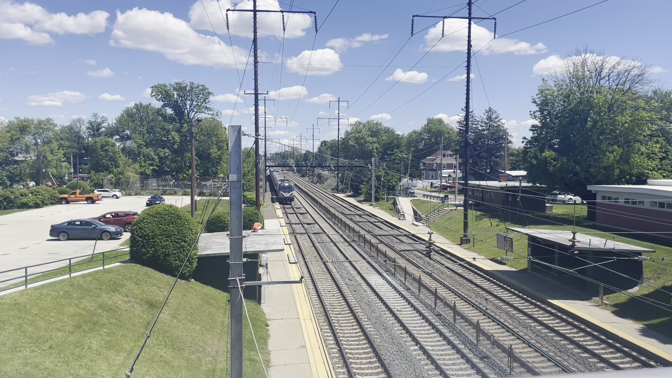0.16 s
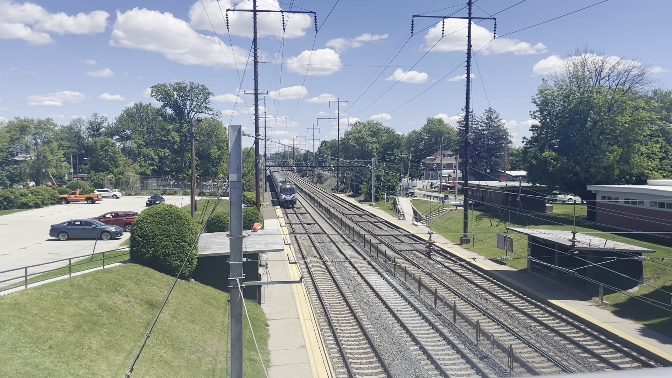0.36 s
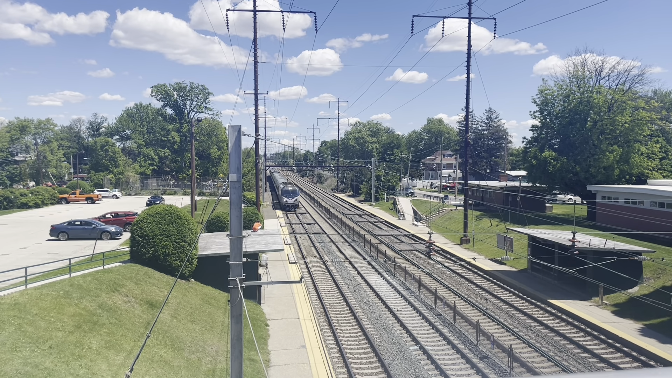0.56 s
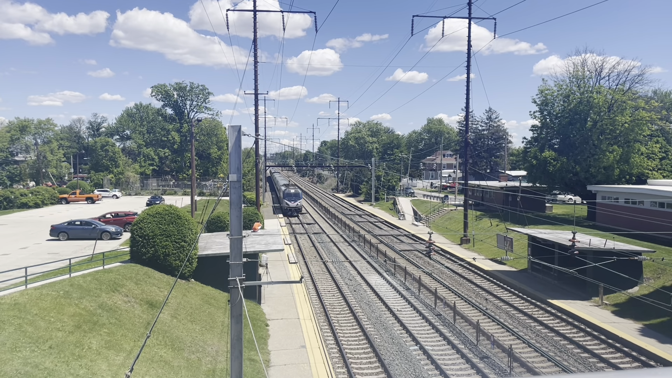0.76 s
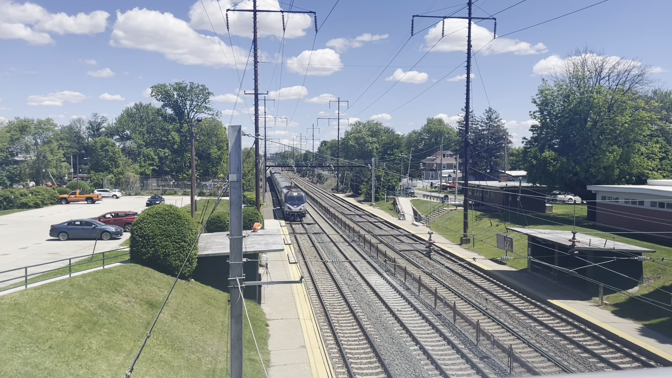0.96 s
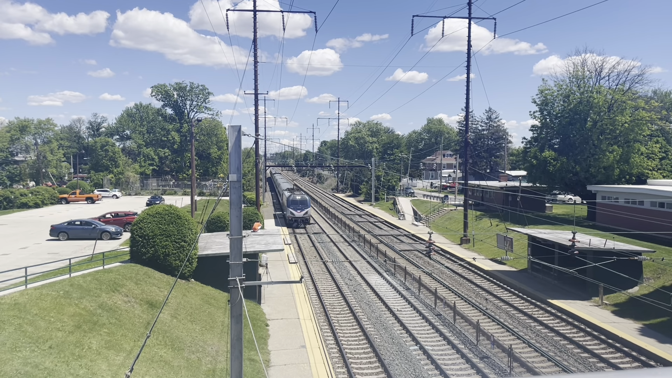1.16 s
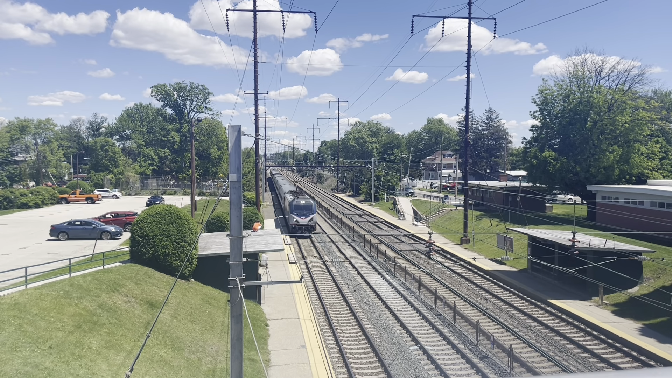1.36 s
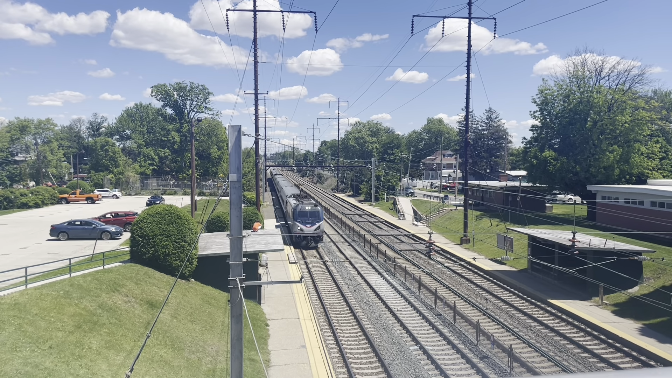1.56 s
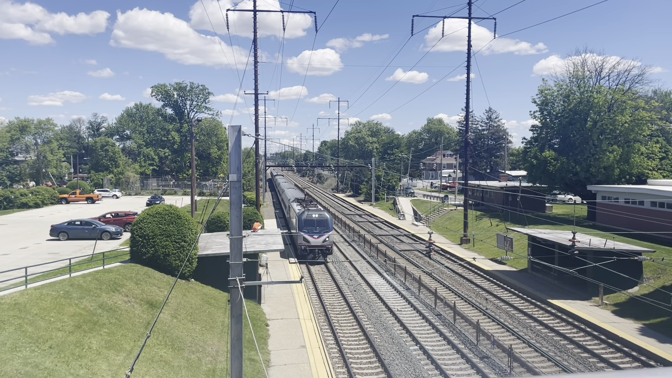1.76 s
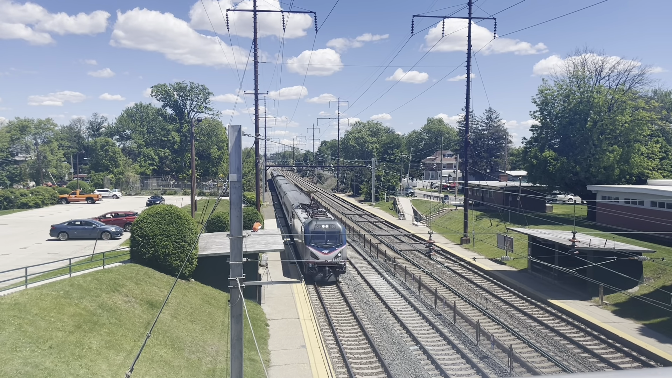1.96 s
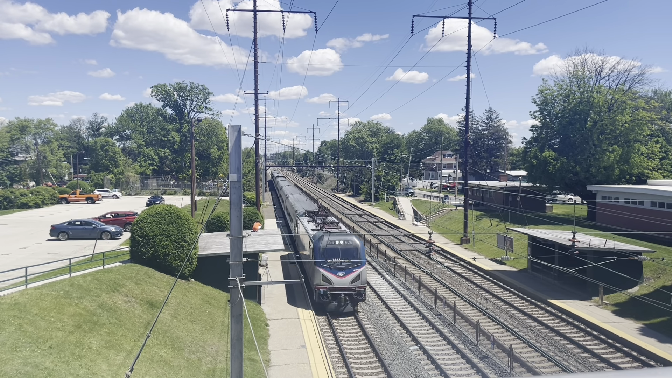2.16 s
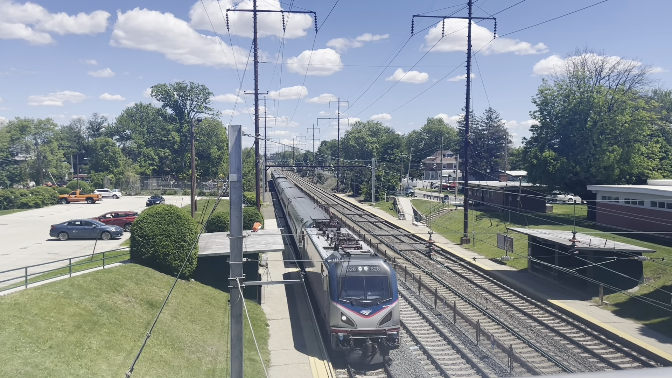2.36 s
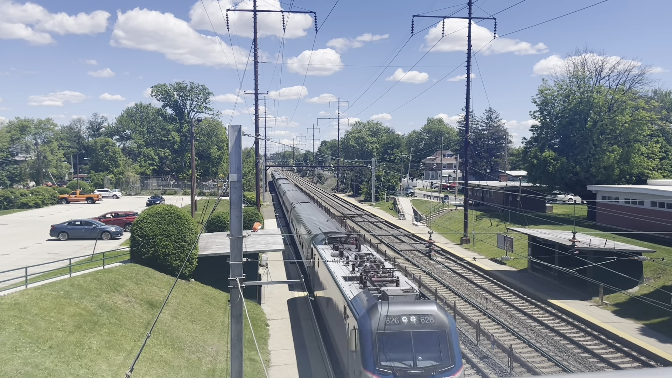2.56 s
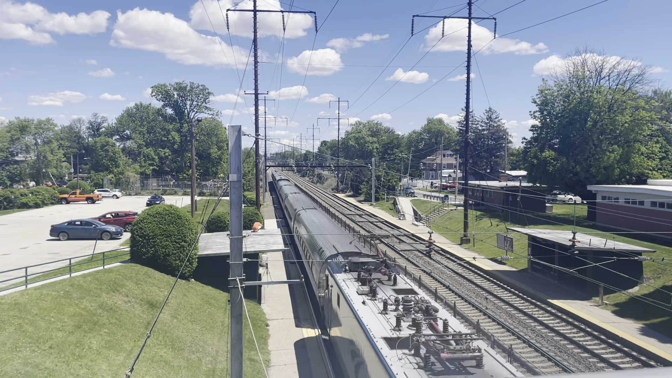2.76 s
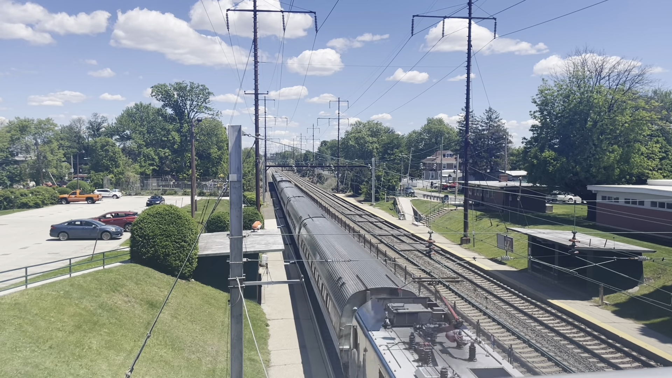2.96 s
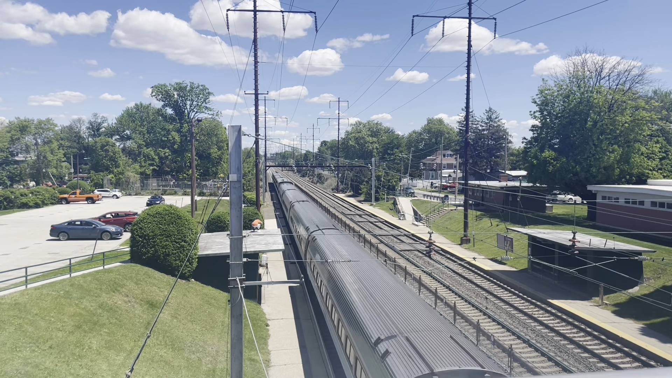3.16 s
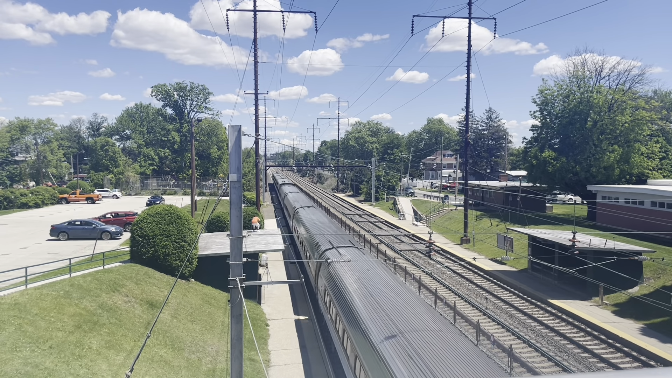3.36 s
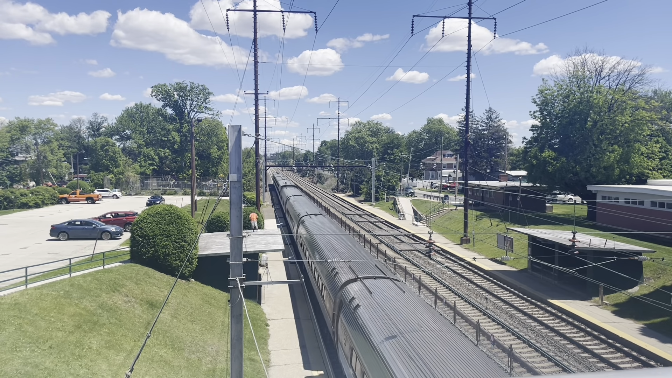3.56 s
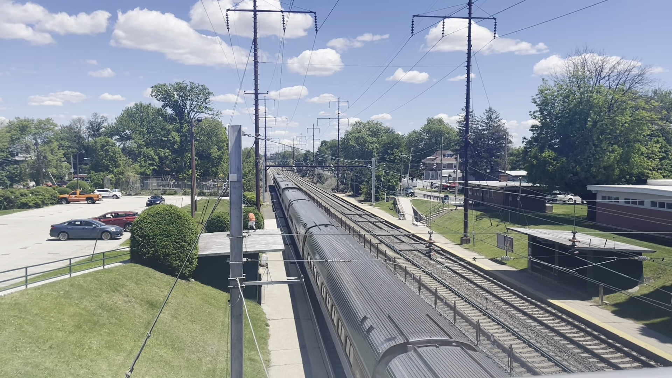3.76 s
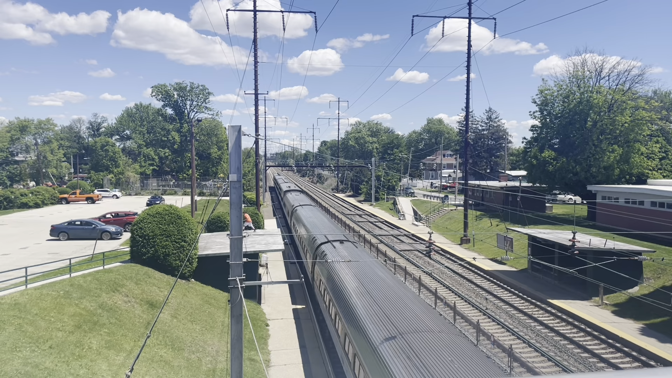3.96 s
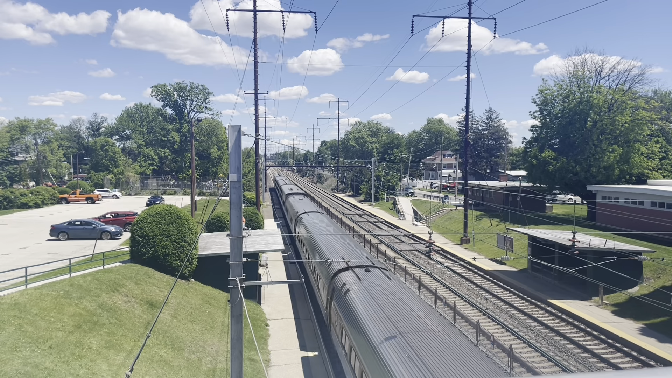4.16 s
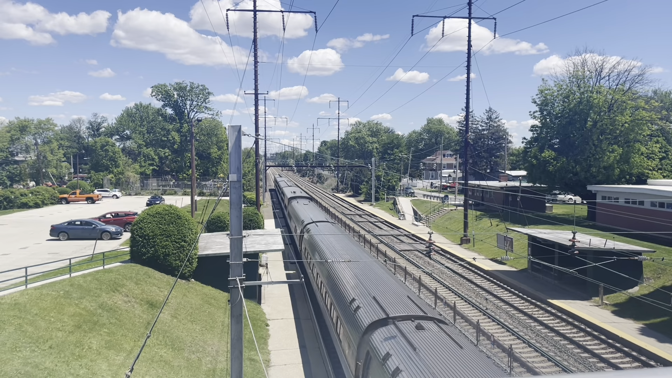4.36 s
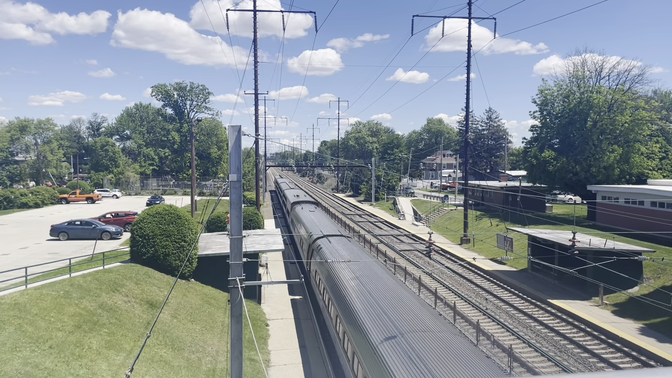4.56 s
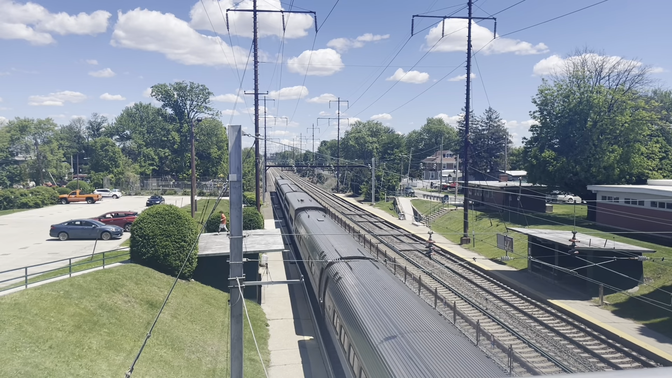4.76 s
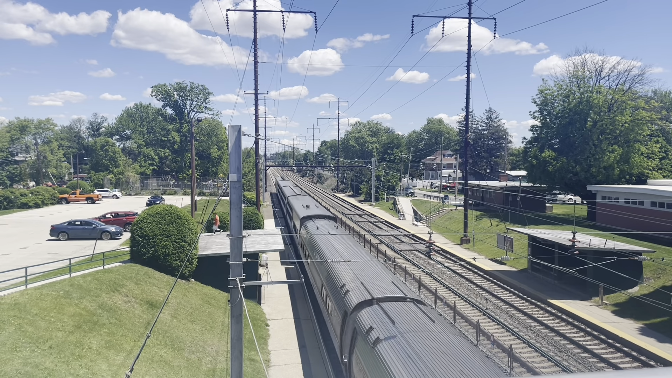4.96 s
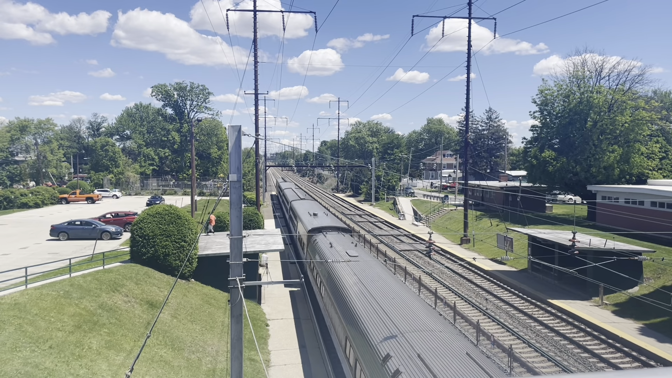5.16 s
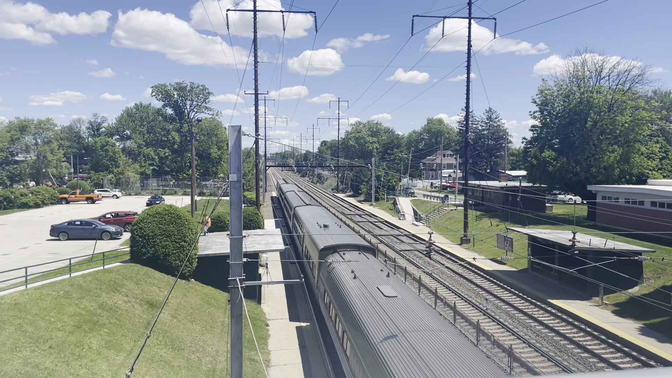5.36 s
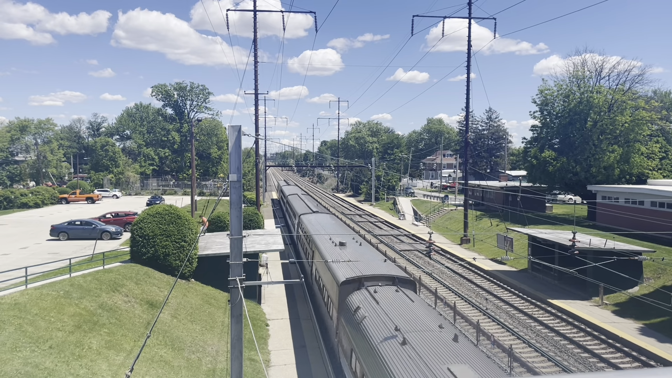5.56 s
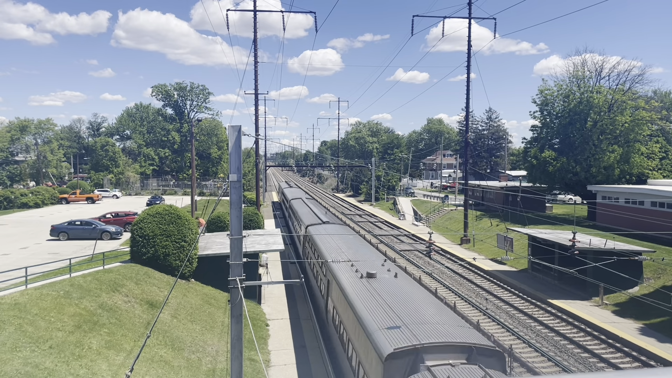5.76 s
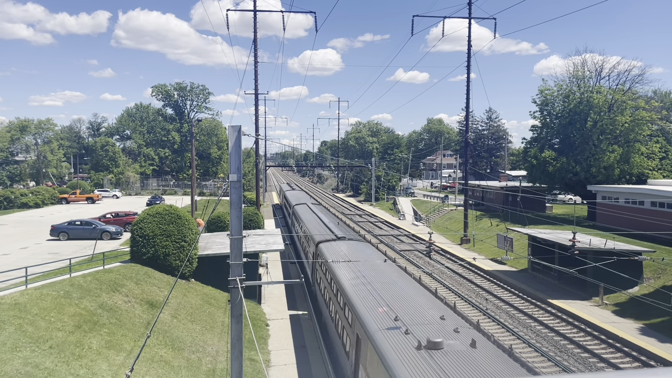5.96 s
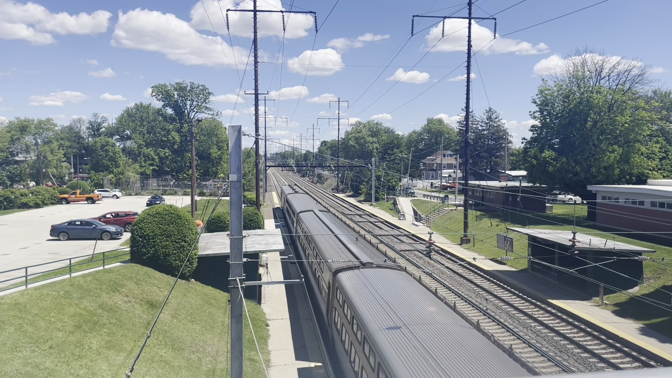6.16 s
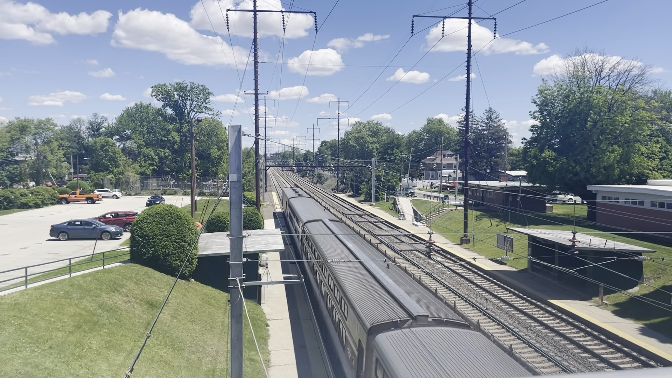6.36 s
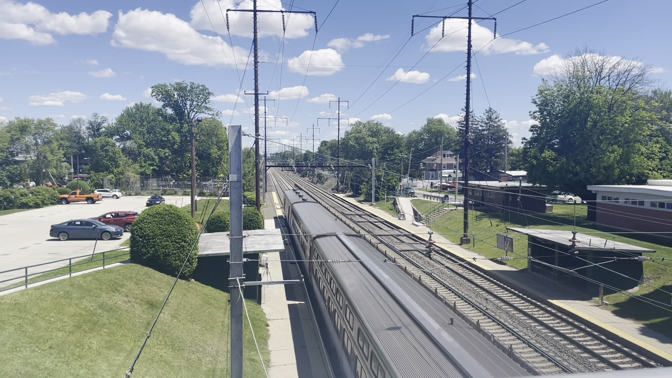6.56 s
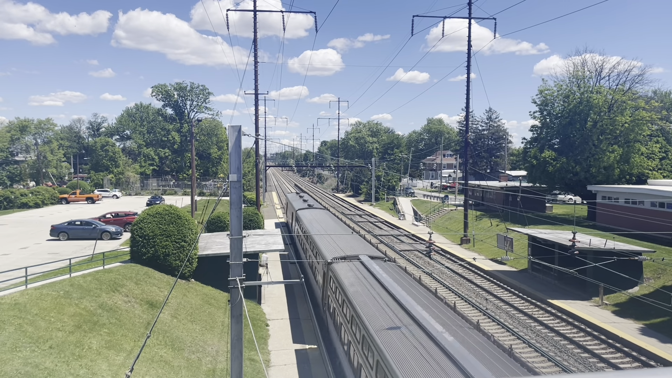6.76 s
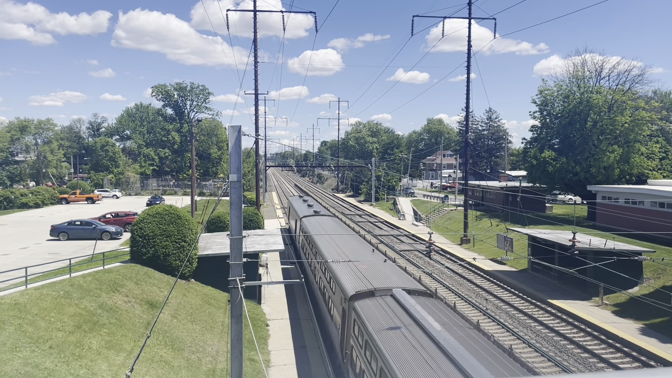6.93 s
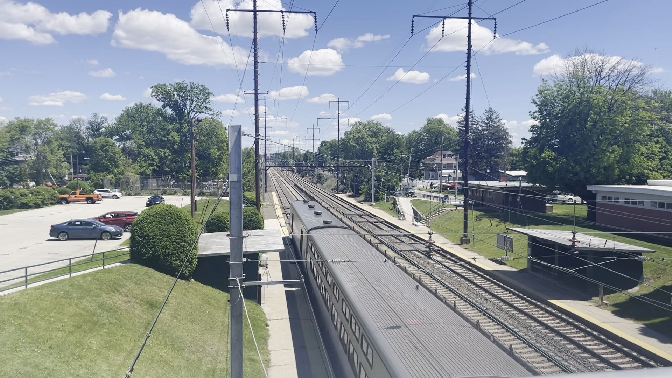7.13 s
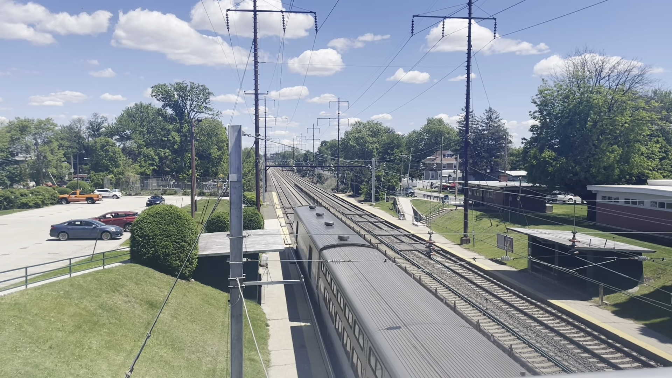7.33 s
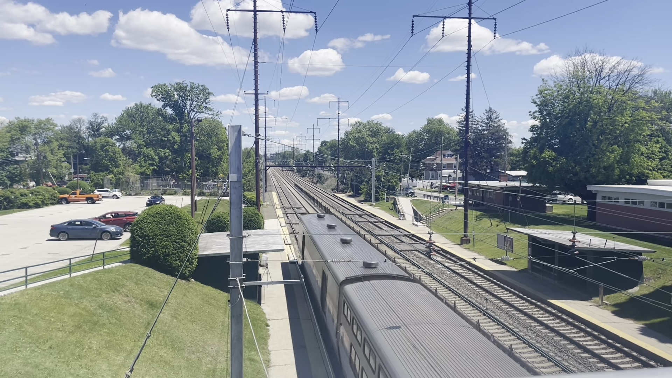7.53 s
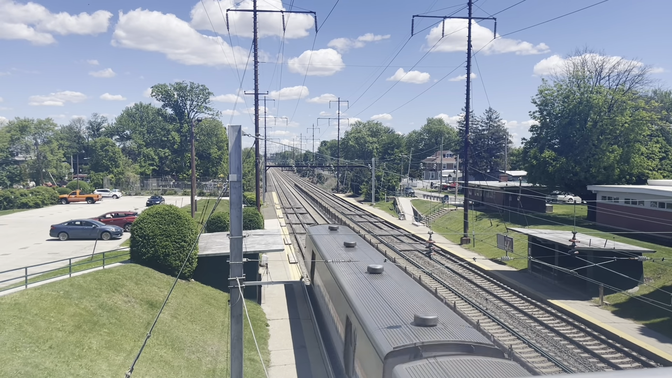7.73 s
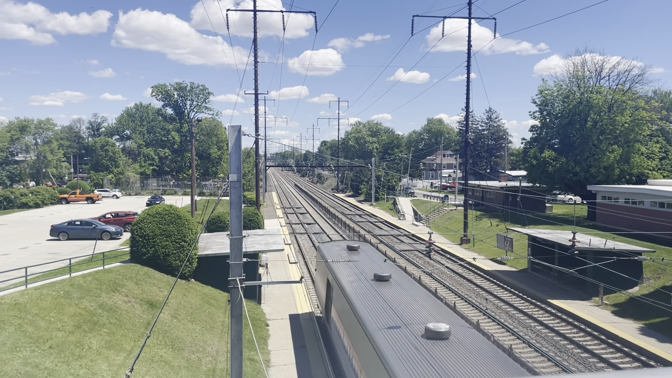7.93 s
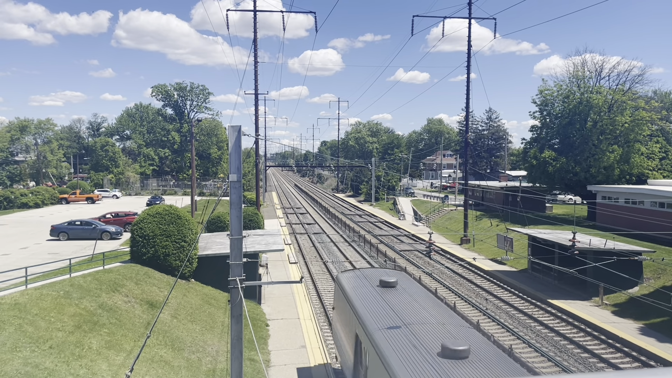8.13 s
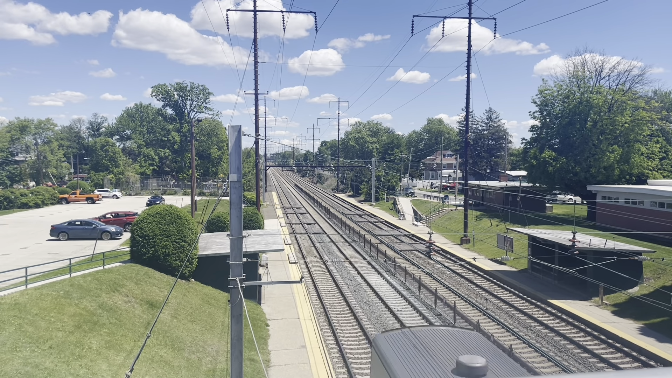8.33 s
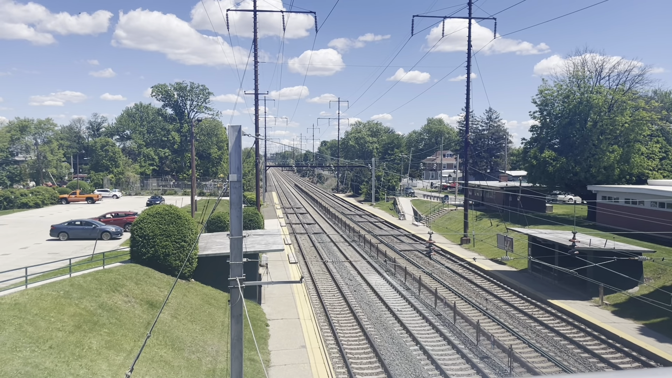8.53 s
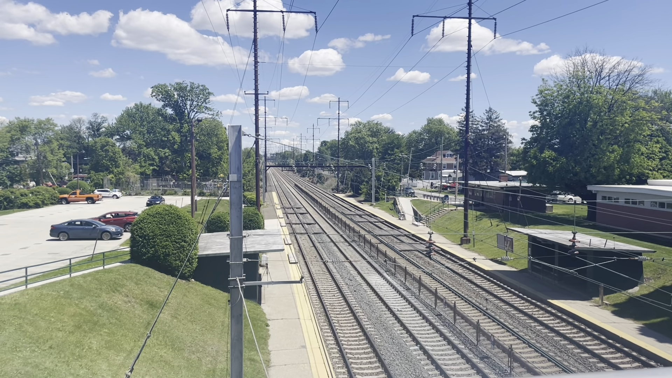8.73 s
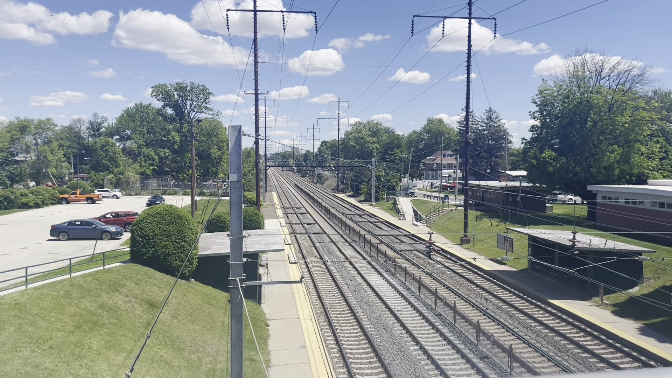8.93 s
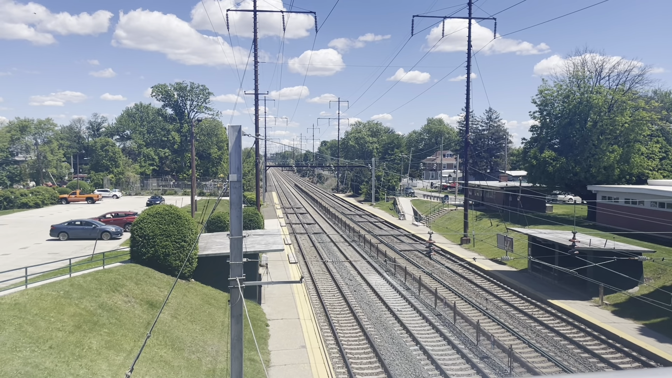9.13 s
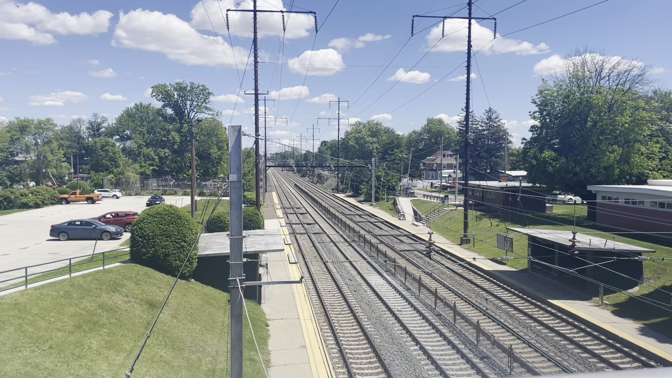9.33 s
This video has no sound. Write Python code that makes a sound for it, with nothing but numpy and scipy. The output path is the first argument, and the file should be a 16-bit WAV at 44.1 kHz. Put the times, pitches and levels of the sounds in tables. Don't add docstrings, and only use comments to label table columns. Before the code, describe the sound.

Outdoors on a road bridge above railway tracks, a bird whistles briefly over insects and distant traffic. An electric locomotive approaches with blower roar, hum and broken whine, then rushes underneath. Coaches follow in pulsing rumble, rough wheel roar and airy hiss, with metallic clanks. The train ends abruptly and a car passes close by, thumping twice. Stereo phone microphone on the parapet.

```python
import sys
import numpy as np
from scipy import signal
from scipy.fft import rfft, irfft, next_fast_len
from scipy.io import wavfile
from scipy.ndimage import uniform_filter1d

SR = 44100
rng = np.random.default_rng(int(sys.argv[2]) if len(sys.argv) > 2 else 0)


def generate_wav(signal):
    frames = np.transpose(np.atleast_2d(signal))
    scaled = np.clip(frames, -1, 1) * 32767
    pcm = np.round(scaled).astype(np.int16)
    wavfile.write(sys.argv[1], SR, pcm)


def decibels_to_gain(level_db):
    exponent = np.asarray(level_db, float) / 20
    return 10 ** exponent


N = 418744
M = next_fast_len(N)
HZ = np.maximum(np.arange(M // 2 + 1) * SR / M, 1)
TIME = np.arange(N) / SR

# t/s, level/dB
CAR = [(8.3, -72), (8.6, -42), (8.9, -31.5), (9.1, -29.5), (9.3, -30.5), (9.5, -29.5)]
AIR_COLUMN, BRAKE_COLUMN, WHEEL_COLUMN, LOAD_COLUMN = 1, 2, 3, 4


def curves(table):
    s, *columns = np.transpose(table)
    return [np.interp(TIME, s, column) for column in columns]


def walk(rate):
    hold = int(SR / rate)
    steps = np.repeat(rng.standard_normal(N // hold + 1), hold)
    smooth = uniform_filter1d(uniform_filter1d(steps, hold), hold)[:N]
    return smooth / smooth.std()


def roar(colour, patchy_db, rate):
    hz, db = np.transpose(colour)
    gain = decibels_to_gain(np.interp(np.log(HZ), np.log(hz), db, left=-120, right=-120))
    chance = rng.standard_normal((2, 2, len(HZ)))
    noise = irfft((chance[0] + 1j * chance[1]) * gain, M)[:, :N]
    noise = noise * decibels_to_gain(patchy_db * walk(rate))
    return noise / noise.std()


def tone(hz, gain, scatter, rate):
    paths = 1 + scatter * (walk(rate) + 1j * walk(rate))
    paths = paths / np.sqrt(1 + 2 * scatter ** 2)
    turning = np.exp(2j * np.pi * np.cumsum(hz) / SR)
    return np.sqrt(2) * gain * (paths * turning).imag


def notes(rows, edge):
    gain = np.zeros(N)
    for s, length, db, *_ in rows:
        to_nearest_end = np.minimum(TIME - s, s + length - TIME)
        gain += decibels_to_gain(db) * np.clip(to_nearest_end / edge, 0, 1)
    return gain


def passes(column, level_db, share, nearing, leaving, far_db, far_share):
    # t/s, air/dB, brake/dB, wheel roughness/dB, axle load/dB
    bogies = [(2.69, 1.5, -3, 5.5, -1), (2.86, -0.5, 0.5, -8.5, 4.5), (3.09, 0.5, 0.5, 5.5, 6.5),
              (3.38, 2.5, 2, 2.5, 4), (3.85, 1, 0.5, 2.5, 1), (4.0, 1, -1, 3, 6), (4.25, -11, -4.5, -14, 2),
              (4.49, .5, -.5, -8, -10), (4.7, 1.5, 0.5, 1.5, -1), (5.17, .5, 0, -3, -1.5),
              (5.35, 0, 0.5, 4, 2), (5.78, -0.5, 1.5, -1.5, -0.5), (5.95, 1, 1.5, 4.5, 1),
              (6.46, -0.4, 1.3, 3.5, -5), (6.65, 0.5, 1.2, 3, 0.5), (7.08, -2, 0, -17, -18),
              (7.33, 4.5, 3, 6.5, 3.5), (7.85, 1, 2, 5, 5.5), (7.95, -0.5, 0, 1, -1), (8.39, 1, 1, 5, 3),
              (8.8, -18, -14.5, -4.5, -2.5)]
    # t/s, level/dB
    train = [(0, -11), (.3, -10), (1.4, -3), (2.3, -.5), (2.8, 2), (3.6, -6), (4.3, -8), (8.4, -8.5),
             (8.9, -9.5), (9.5, -11)]
    coarse, rows = TIME[::256], np.array(bogies)
    away = coarse - rows[:, :1]
    spread = 1 + (away / np.where(away < 0, nearing, leaving)) ** 2
    near_power = ((decibels_to_gain(share * rows[:, [column]]) / spread) ** 2).sum(axis=0)
    far_power = decibels_to_gain(far_db + far_share * np.interp(coarse, *np.transpose(train))) ** 2
    return decibels_to_gain(level_db) * np.interp(TIME, coarse, np.sqrt(near_power + far_power))


def surroundings():
    # f/Hz, level/dB per Hz
    town = [(18, -39), (30, -4), (108, 2), (274, -15), (353, -6), (766, -6.5), (858, -12.5), (1180, -9.5),
            (3300, -23.5), (6540, -80), (7000, -51), (9100, -77), (15400, -120)]
    insects = [(6500, -51), (8900, -21), (9500, 2), (9900, -2), (10500, 2), (10850, 2), (11250, 7),
               (11500, 3), (11800, 3), (12300, -4), (13300, 1), (13600, 1), (14000, -12), (15700, -16)]
    traffic = decibels_to_gain(-38) * roar(town, patchy_db=-2.0, rate=3.63)
    return traffic + decibels_to_gain(-58.5) * roar(insects, patchy_db=0.6, rate=14)


def bird():
    # start t/s, length/s, level/dB, from f/Hz, to f/Hz
    whistle = [
        (.012, .036, -63, 4950, 5400),
        (.048, .06, -62, 6200, 6300),
        (.11, .11, -61, 6450, 6650),
        (.222, .04, -62, 6900, 7050),
        (.264, .035, -61, 7100, 7550),
        (.312, .034, -62, 7300, 7380),
    ]
    s, length, _, from_hz, to_hz = np.transpose(whistle)
    corners = np.ravel([s, s + length], "F")
    hz = np.interp(TIME, corners, np.ravel([from_hz, to_hz], "F"))
    return tone(hz, notes(whistle, edge=0.004), scatter=.35, rate=120)


def tyres():
    # f/Hz, level/dB per Hz
    tyre_colour = [(150, -29), (250, -5.5), (388, -2), (563, -11), (662, -5.5), (906, -12.5), (1030, -7.5),
                   (1170, -9), (1380, -28), (1880, -15.5), (2240, -33), (2540, -29), (4000, -50.5),
                   (5200, -70), (8800, -120)]
    return decibels_to_gain(curves(CAR)[0]) * roar(tyre_colour, patchy_db=2.0, rate=9.7)


def knocks():
    # t/s, peak/dB, f/Hz, time to fall 60 dB/s, roughness 0-1
    clanks = [(.27, -39, 50, .9, 0.4), (.262, -19, 88, .12, 0.01), (.264, -29.5, 161, 0.072, .6),
              (2.098, -27, 3200, 0.049, .35), (2.1, -26, 2830, .08, 0.1), (2.58, -22, 1760, 0.26, 0.14),
              (2.583, -24, 3160, .4, 0.05), (2.59, -38, 4580, .6, .01), (2.669, -37, 4540, 0.43, .01),
              (3.27, -19.5, 1730, 0.56, 0.14), (3.27, -25, 3040, .15, .05), (3.39, -28, 4030, 0.25, .08),
              (7.74, -16.5, 822, 0.22, 0.12), (8.695, -31, 2430, .07, .2), (8.757, -23, 2440, 0.098, 0.14),
              (8.84, -33.5, 2500, .07, .2)]
    # t/s, peak/dB, f/Hz, time to fall 60 dB/s, roughness 0-1
    joint = [(8.885, -27, 597, .16, 0.9), (8.903, -18, 800, .065, 0.04), (8.93, -8.5, 494, 0.042, .01),
             (8.94, -12, 580, .035, 0.03), (8.942, -20.5, 300, .08, 0.7), (9.18, -23, 350, .06, 0.8),
             (8.965, -17, 70, 0.55, 0.07), (9.138, -23, 580, 0.16, .7), (9.146, -18.5, 750, 0.034, .09),
             (9.173, -8.5, 469, 0.033, 0), (9.205, -16, 75, 0.066, 0)]
    out, grit = np.zeros(N), rng.standard_normal(N)
    for s, peak_db, hz, t60, rough in clanks + joint:
        rise = .0012 + .012 * t60 + .3 / hz
        start, rough = int(s * SR), np.clip(rough, .01, 1)
        t = TIME[:min(int(t60 * SR), N - start)]
        ring = (1 - np.exp(-(t / rise) ** 2)) * np.exp(-np.log(1000) * t / t60)
        edges_hz = hz * np.exp([-rough / 2, rough / 2])
        band = signal.butter(2, edges_hz, "band", fs=SR, output="sos")
        rattle = signal.sosfilt(band, grit[start - SR // 10:start + len(t)])[SR // 10:]
        share = min(4 * rough, 1)
        body = (1 - share) * np.sin(2 * np.pi * hz * t) + share * rattle / rattle.std()
        out[start:][:len(t)] += decibels_to_gain(peak_db) * ring / ring.max() * body
    return out


def blowers():
    # t/s, level/dB
    head = [(0.0, -41.5), (0.45, -35.5), (1.3, -31.5), (1.45, -28.5), (1.9, -28), (2.5, -23.5),
            (3.3, -23.5), (3.7, -48), (4, -67)]
    # f/Hz, level/dB per Hz
    fan_colour = [(150, -45), (250, -19), (289, -16), (330, -2.5), (369, -5.5), (457, -9.5), (667, -18.5),
                  (834, -20.5), (943, -14), (1360, -10), (1630, -26.5), (1950, -16.5), (3600, -28.5),
                  (4680, -66), (7920, -120)]
    return decibels_to_gain(curves(head)[0]) * roar(fan_colour, patchy_db=0.24, rate=25)


def locomotive():
    # t/s, level/dB
    hum_level = [(0, -53.5), (1, -38), (1.9, -32), (2.56, -23), (2.7, -33), (2.8, -18), (3, -21.5),
                 (3.07, -33), (3.5, -48)]
    # start t/s, length/s, level/dB
    whine = [
        (1.35, 0.4, -40),
        (2.17, .21, -36),
        (2.58, .17, -26),
        (2.78, 0.093, -38),
    ]
    # t/s, level/dB
    wire_level = [(0, -76), (.9, -79), (1.5, -61), (2.6, -64), (2.9, -85)]
    past = TIME - 2.8
    sag = 1 - .05 * (1 + past / np.hypot(past, 0.198)) / 2
    hum = tone(334.8 * sag, decibels_to_gain(curves(hum_level)[0]), scatter=.35, rate=30)
    gears = tone(1950 * sag, notes(whine, edge=.02), scatter=.6, rate=60)
    wire = tone(11250 * sag, decibels_to_gain(curves(wire_level)[0]), scatter=4, rate=350)
    return hum + gears + wire


def ground():
    # f/Hz, level/dB per Hz
    deep = [(20, -30), (32, -11), (45, -1), (68, 2), (100, -3.5), (130, -20)]
    boom = [(75, -36), (105, 0.5), (145, 0), (200, -4), (300, -10), (400, -22)]
    car_db = curves(CAR)[0]
    deep_train = passes(LOAD_COLUMN, level_db=-32, share=0.48, nearing=0.92, leaving=0.3,
                        far_db=1.5, far_share=0.8)
    boom_train = passes(LOAD_COLUMN, level_db=-32.5, share=1.5, nearing=0.45, leaving=.35,
                        far_db=4.5, far_share=1.6)
    rumble = np.hypot(deep_train, decibels_to_gain(car_db - 0.5)) * roar(deep, patchy_db=0.5, rate=8)
    return rumble + np.hypot(boom_train, decibels_to_gain(car_db - 2)) * roar(boom, patchy_db=1.5, rate=20)


def rolling():
    # f/Hz, level/dB per Hz
    rail = [(250, -29), (370, -5), (520, 0), (620, -4), (700, -15.5), (850, -58)]
    span = [(600, -15), (720, -2.5), (850, 1.5), (950, -1), (1100, 1.5), (1400, -2), (1650, -5.5),
            (2000, -19)]
    disc = [(1400, -1.5), (1700, -5.5), (1900, 2), (2100, 2.5), (2250, -2.5), (2400, -3.5), (2800, -16),
            (3600, -34)]
    rail_level = passes(WHEEL_COLUMN, level_db=-28.5, share=0.84, nearing=.31, leaving=0.2237,
                        far_db=-18, far_share=2)
    span_level = passes(WHEEL_COLUMN, level_db=-33, share=1.5, nearing=0.29, leaving=0.245,
                        far_db=0, far_share=1.5)
    disc_level = passes(AIR_COLUMN, level_db=-30.5, share=1.02, nearing=0.2538, leaving=0.27,
                        far_db=-5, far_share=1.34)
    sound = rail_level * roar(rail, patchy_db=1.5, rate=35)
    sound += span_level * roar(span, patchy_db=.5, rate=33)
    sound += disc_level * roar(disc, patchy_db=0.5, rate=30)
    lumps = decibels_to_gain(.8 * walk(45))
    return lumps * sound


def air():
    # f/Hz, level/dB per Hz
    rush = [(2300, -5), (2800, 0), (3300, -3.5), (4000, -9.5), (4600, -18.5)]
    hiss = [(3500, -2.5), (4000, 0.5), (4700, -0.5), (5250, -3.5), (5600, -18)]
    fizz = [(4800, -9), (5500, 6.5), (6500, 3.5), (7500, 4), (9000, 3), (11000, -4), (13000, -9.5),
            (15000, -15), (15300, -21), (15800, -29)]
    # t/s, gain/dB
    blasts = [
        (2.11, 2.2),
        (2.79, 2.6),
        (5.29, 1.6),
        (7.39, 3),
        (7.77, 3.2),
        (7.99, 1.6),
        (8.76, 3.8),
    ]
    rush_level = passes(AIR_COLUMN, level_db=-38.5, share=1.58, nearing=0.28, leaving=0.17,
                        far_db=-1.5, far_share=1.46)
    hiss_level = passes(BRAKE_COLUMN, level_db=-40, share=1.4, nearing=0.11, leaving=0.22,
                        far_db=-2, far_share=1.75)
    fizz_level = passes(AIR_COLUMN, level_db=-41.5, share=0.84, nearing=0.14, leaving=0.2,
                        far_db=-1, far_share=2.3)
    fizz_level = np.hypot(fizz_level, decibels_to_gain(curves(CAR)[0] - 27.5))
    sound = rush_level * roar(rush, patchy_db=1.8, rate=6.4)
    sound += hiss_level * roar(hiss, patchy_db=-1.1, rate=9)
    sound += fizz_level * roar(fizz, patchy_db=0.73, rate=14)
    blast_s = 0.027
    blasts_db = sum(db * np.exp(-((TIME - s) / blast_s) ** 2) for s, db in blasts)
    return decibels_to_gain(0.52 * walk(16) + blasts_db) * sound


def scene():
    # t/s, level/dB
    around = [(0, 4.5), (2, -0.5), (3, 0.5), (8.4, 0.5), (8.9, 5.5), (9.5, 2.5)]
    sound = surroundings() + tyres() + blowers() + ground() + rolling() + air()
    sound[0] += bird() + knocks() + locomotive()
    sound[1] *= decibels_to_gain(curves(around)[0])
    return sound


def roll_off(x):
    return signal.sosfilt(signal.butter(12, 15800, fs=SR, output="sos"), x)


def record(dry):
    # f/Hz, left leads/rad, left minus right/dB, unshared part/dB
    ports = [(30, -.4, 0, -19), (300, -.35, .3, -20), (620, -.7, 0, -13), (800, .3, -3.5, -6),
             (1200, 0, -1.5, -9), (1700, -.1, -6, -10), (1950, -.4, 1.5, -12), (3000, .1, 2.5, -10),
             (4200, 0, 3, -10), (5200, .7, 5, -7), (6000, -.15, 1.5, -13), (6800, -1.2, 1.5, -10),
             (7600, -2.9, 0, -11), (9000, -3.9, 0, -10), (11200, -6.28, 0, -10), (12400, -6.5, 0, -8),
             (13000, -7.4, 0, -6), (13650, -8.2, 0, -7), (13900, -9.4, 0, -7)]
    # from f/Hz, to f/Hz
    no_mid = [(7600, 8920), (13770, 23000)]
    no_side = [(11030, 12400), (15800, 23000)]
    hz, *columns = np.transpose(ports)
    lead, balance_db, unshared_db = (np.interp(HZ, hz, column) for column in columns)
    shared, unshared = rfft(dry, M)
    unshared = decibels_to_gain(unshared_db) * unshared
    port = decibels_to_gain(balance_db / 2) * np.exp(.5j * lead)
    left = (shared + unshared) * port
    right = (shared - unshared) / port
    mid, side = (left + right) / 2, (left - right) / 2
    for lo, hi in no_mid:
        mid = mid * ((HZ < lo) | (HZ > hi))
    for lo, hi in no_side:
        side = side * ((HZ < lo) | (HZ > hi))
    mix = irfft(np.array([mid + side, mid - side]), M)[:, :N]
    return roll_off(mix)


dry = scene()
out = record(dry)
generate_wav(out)
```